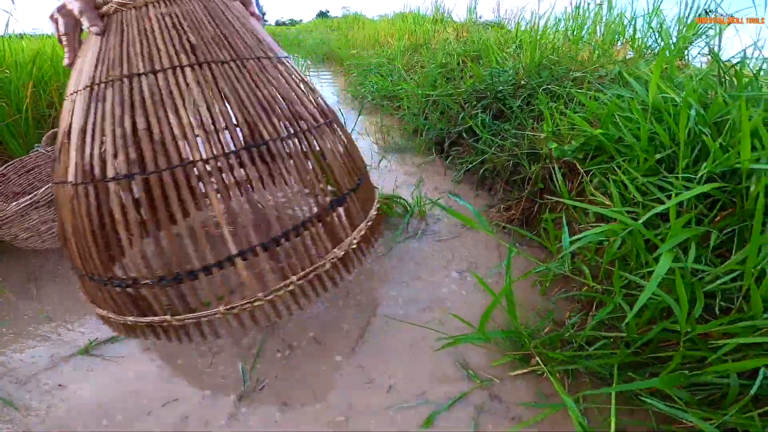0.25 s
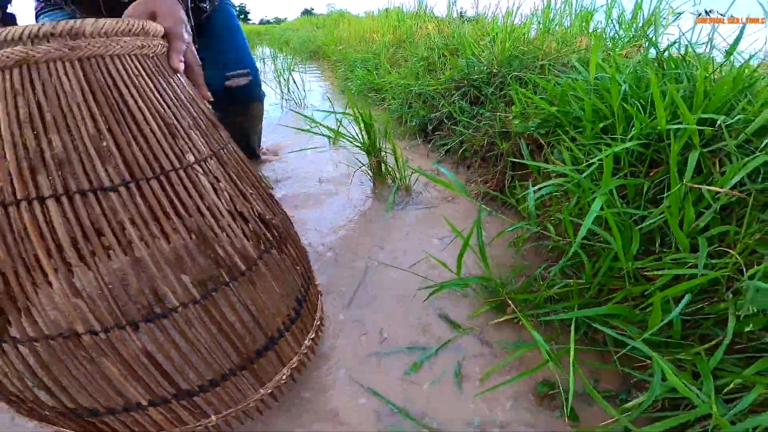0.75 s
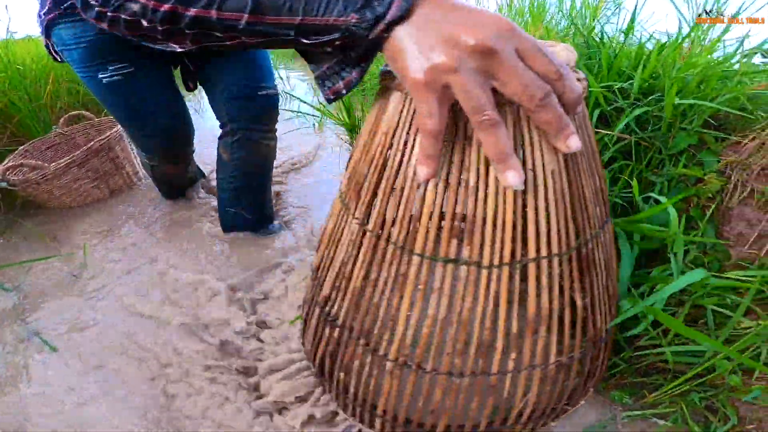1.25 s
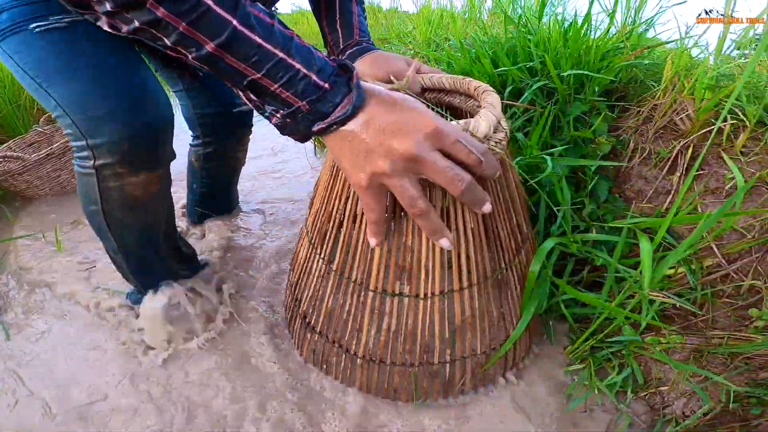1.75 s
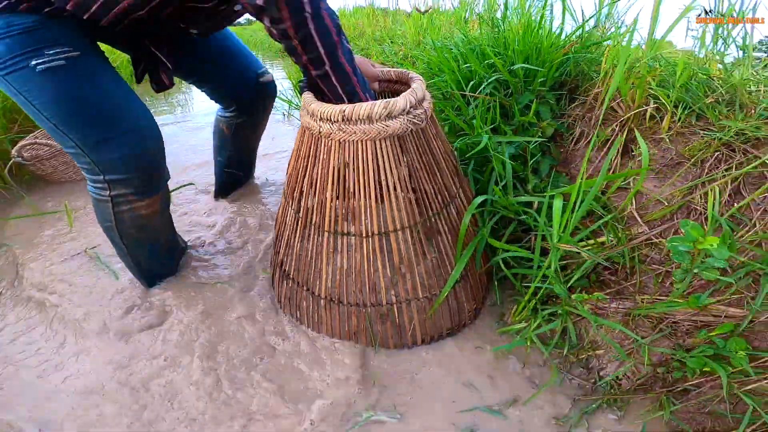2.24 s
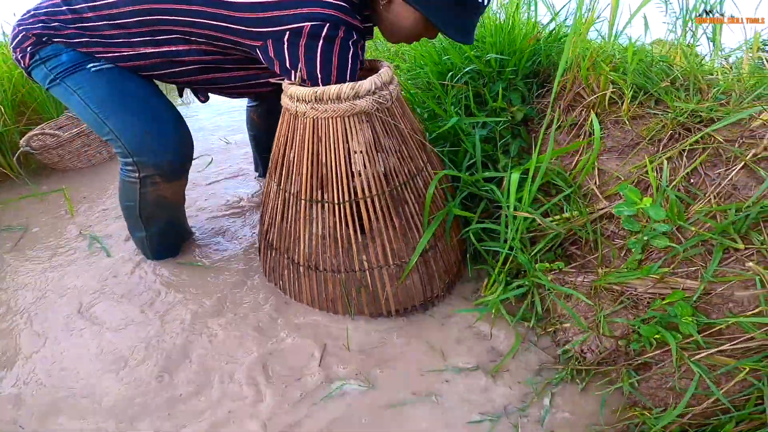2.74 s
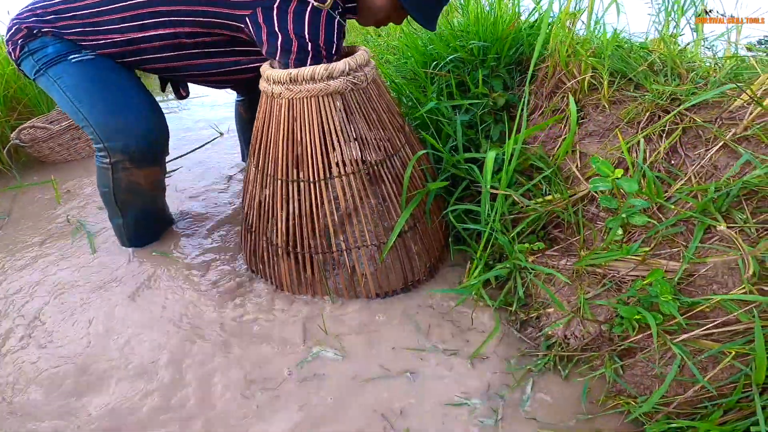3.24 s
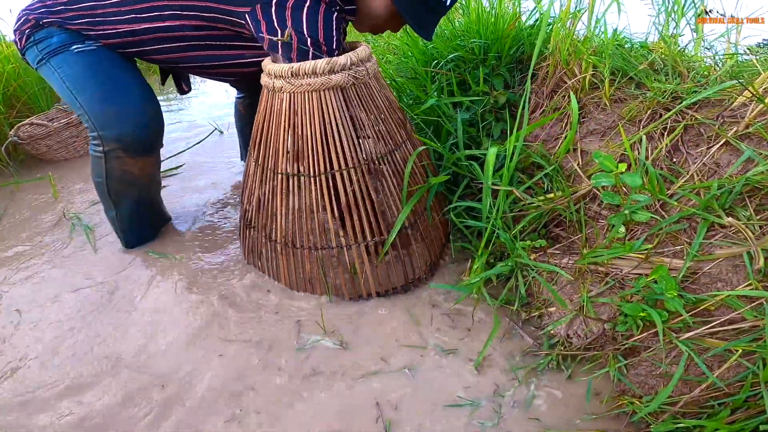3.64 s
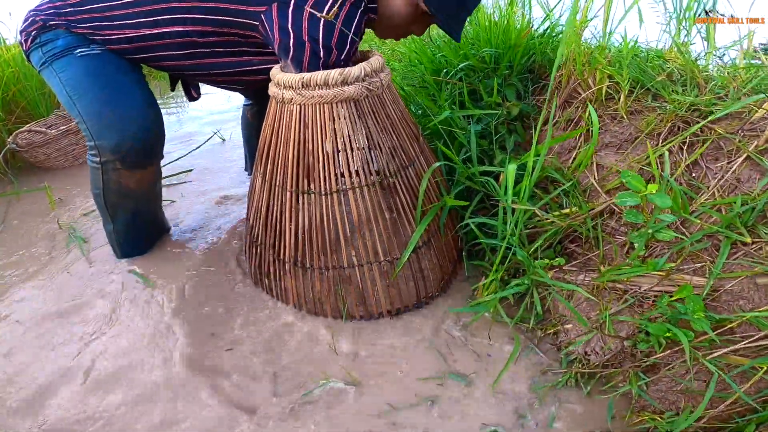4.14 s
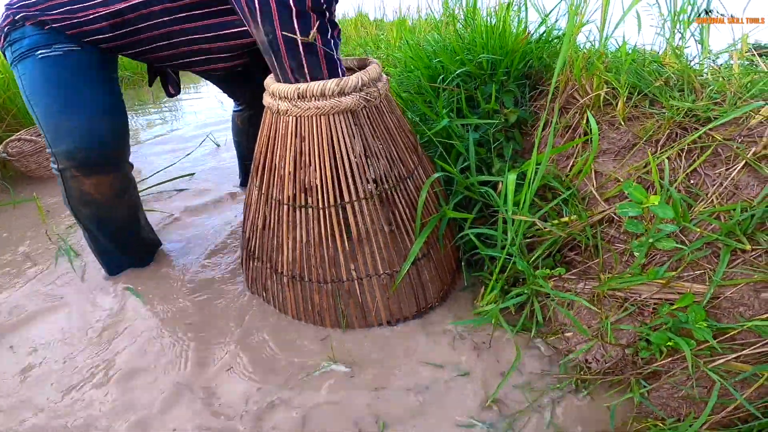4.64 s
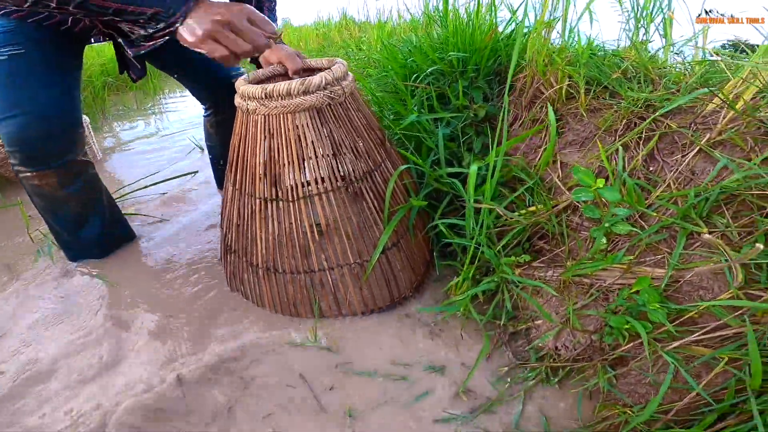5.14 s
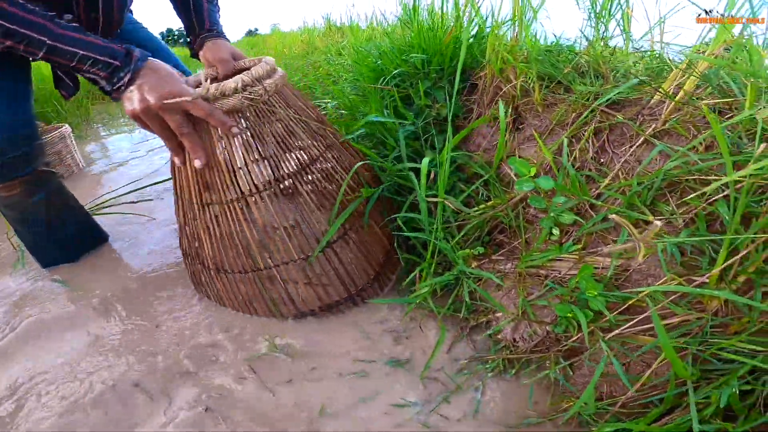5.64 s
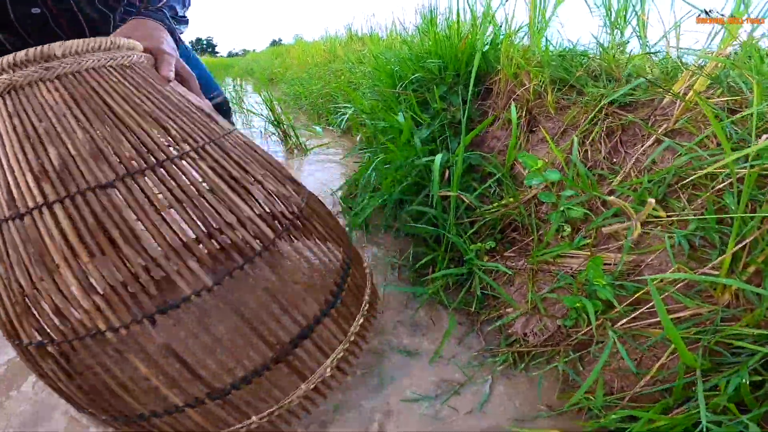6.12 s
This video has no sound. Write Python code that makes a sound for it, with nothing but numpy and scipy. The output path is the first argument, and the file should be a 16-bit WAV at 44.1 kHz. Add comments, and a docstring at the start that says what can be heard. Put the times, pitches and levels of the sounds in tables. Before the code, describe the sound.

Muddy water swashes, bubbles and drips around a pushed-down basket as single frog chirps give way to two close frogs calling rapidly.

```python
"""A rattan basket trap is pushed into shallow muddy water: boots and an arm slosh, bubbles gulp, drops tick.
Close to the microphones two frogs call, one left and one ahead, after a third on the bank.
Behind them come farther callers, a blurred chorus and the low throb of a distant engine.
Frogs are pulses ringing a throat, bubbles are gliding sines, water is swarms of damped sines with noise,
and the engine is throbbing noise; frogs and basket get a short echo off the grass banks."""
import sys
import numpy as np
from scipy import signal
from scipy.fft import rfft, irfft, next_fast_len
from scipy.io import wavfile
from scipy.ndimage import uniform_filter1d, map_coordinates

SR = 44100
rng = np.random.default_rng(int(sys.argv[2]) if len(sys.argv) > 2 else 0)


def persist_wave(psi):
    """Save psi, clipped to +-1, as 16-bit WAV."""
    counts = np.round(np.clip(psi, -1, 1) * 32767).astype(np.int16)
    wavfile.write(sys.argv[1], SR, np.atleast_2d(counts).T)


N = 281358  # samples
TIME_S = np.arange(N) / SR


def amp(db):
    """Decibels to gain."""
    return 10 ** (np.asarray(db) / 20)


def unit(x):
    """Scaled to rms 1."""
    return x / np.sqrt(np.mean(x ** 2) + 1e-20)


def along(points, hz):
    """Reads a (freq_hz, value) curve, straight on a log frequency axis."""
    freq_hz, value = np.transpose(points)
    return np.interp(np.log(hz + 1), np.log(freq_hz + 1), value)


def wobble(rate):
    """A smooth random curve, rate knots a second."""
    knots = rng.standard_normal(int(N * rate / SR) + 4)
    return map_coordinates(knots, [np.arange(N) * rate / SR])


def filtered(x, response):
    """Filters x by a response given as a function of frequency."""
    size = next_fast_len(N + 8192)
    spectrum = rfft(x, size) * response(np.fft.rfftfreq(size, 1 / SR))
    return irfft(spectrum, size)[..., :N]


def causal(points):
    """Minimum-phase impulse response of a (freq_hz, level_db) spectrum, energy 1."""
    cepstrum = irfft(np.log(amp(along(points, np.fft.rfftfreq(4096, 1 / SR)))))
    cepstrum[1:2048] *= 2  # folding the cepstrum forward gives minimum phase
    cepstrum[2049:] = 0
    impulse = irfft(np.exp(rfft(cepstrum)))[:1024]
    return impulse / np.linalg.norm(impulse)


def add(out, start_s, x):
    """Mixes x into out from start_s on, cut at the end of either."""
    part = out[..., round(start_s * SR):][..., :x.shape[-1]]
    part += x[..., :part.shape[-1]]


def sides(pan_db):
    """Left and right gains for a level difference, positive to the left."""
    return amp(np.array([[pan_db / 2], [-pan_db / 2]]))


def widen(pair, spectrum, alike):
    """Colours two unrelated signals and mixes them to a left-right likeness; rms 1."""
    def mid_and_side(hz):
        turn = np.arccos(np.clip(along(alike, hz), -1, 1)) / 2
        return amp(along(spectrum, hz)) * [np.cos(turn), np.sin(turn)]

    mid, side = filtered(pair, mid_and_side)
    return unit(np.array([mid + side, mid - side]))


def banks(x, t60, delay):
    """Short echo off the grass banks: fading noise, unlike left and right and new each time."""
    t = np.arange(SR // 5) / SR
    tail = rng.standard_normal((2, len(t))) * amp(-60 * t / t60) * (t > delay)
    echo = signal.fftconvolve(x[None], tail, axes=1)
    return echo * np.linalg.norm(x) / np.linalg.norm(echo, axis=1, keepdims=True)


# Loudness of the distant engine: start_s, level_db
ENGINE_LEVEL = [(0, -36.5), (5.1, -43), (6, -39)]
# Exhaust noise, relative: freq_hz, density_db (per Hz)
EXHAUST_SPECTRUM = [(15, -62.5), (25, -16.5), (75, 1.5), (108, -1), (139, 4), (179, -9.5), (221, -16.5),
                    (577, -37.5), (600, -69), (1320, -120)]
# Puff of each firing, relative: freq_hz, density_db (per Hz)
PUFF_SPECTRUM = [(150, -32), (220, 1), (380, -3), (520, -26), (700, -98.5)]
PUFF_DB, PUFF_SHARP = -17.5, 0.654  # level relative to the exhaust; a higher exponent shortens the puff


def engine():
    """Low exhaust noise, throbbing once per firing, with a short puff above it."""
    level_db = np.interp(TIME_S, *np.transpose(ENGINE_LEVEL))
    firing_hz = 24.0 + 1.589 * wobble(3.9)
    stroke = np.cos(2 * np.pi * np.cumsum(firing_hz) / SR)
    alike = [(30, 0.82), (70, 1.0), (150, 0.985)]  # freq_hz, left-right likeness
    throb = rng.standard_normal((2, N)) * (1 + 0.373 * stroke)
    puff = rng.standard_normal((2, N)) * np.exp(PUFF_SHARP * stroke)
    exhaust = widen(throb, EXHAUST_SPECTRUM, alike)
    puffs = widen(puff, PUFF_SPECTRUM, alike)
    return amp(level_db) * (exhaust + amp(PUFF_DB) * puffs)


# Far throats, alone and massed, relative: freq_hz, level_db
FAR_THROAT = [(1200, -29), (2300, -32.5), (2900, 1), (3150, 5.5), (3450, -8), (4000, -18), (6000, -43)]
CHORUS_DB = -49.5


def chorus():
    """The farthest frogs blur into a narrow band of noise that trembles at their pulse rate."""
    pulse_hz = 435 + 12 * wobble(9.8)
    buzz = 1 + .5 * np.cos(2 * np.pi * np.cumsum(pulse_hz) / SR)
    swell = amp(3 * np.array([wobble(9), wobble(9)]))
    noise = rng.standard_normal((2, N)) * buzz * swell
    return amp(CHORUS_DB) * widen(noise, FAR_THROAT, [(3000, 0.11)])


WAVER = .009  # random wander of the pitch, as a share
UNEVEN_DB = 2.6  # throat colour changes from call to call
RASP = .35  # air noise when fully rough


def frog(calls, shape, throat, pan_db, echo_db, lag_s):
    """Vocal-fold pulses ring the throat; rough stretches hiss, jitter and weaken every other pulse."""
    out, grid_hz = np.zeros((2, N)), np.arange(400, 15000, 400)
    share, *shape_columns = np.transpose(shape)
    for start_s, length_s, call_db, pitch_hz, sag, *sac_hz in calls:
        throat_db = along(throat, grid_hz) + UNEVEN_DB * rng.standard_normal(len(grid_hz))
        ring = causal(np.c_[grid_hz, throat_db])
        t = np.arange(int(length_s * SR)) / SR
        level_db, bend, rough = [np.interp(t / length_s, share, column) for column in shape_columns]
        waver = 1 + WAVER * np.interp(t, np.arange(12) / 80, rng.standard_normal(12))
        cycle = np.cumsum(pitch_hz * waver * bend ** sag) / SR

        at = np.flatnonzero(np.diff(np.floor(cycle), prepend=-1))
        level_z, timing_z = rng.standard_normal((2, len(at)))
        weak = np.arange(len(at)) % 2
        pulse_db = call_db + level_db[at] + rough[at] * (4.7 * level_z - 3.0 * weak)
        period = SR / pitch_hz  # samples
        size = amp(pulse_db) * np.sqrt(period)
        place = at - cycle[at] % 1 * period * (at > 0)  # between samples
        place = place + np.abs(rough[at] * timing_z) * 0.12 * period
        whole, part = place.astype(int), place % 1
        pulses = np.bincount(np.r_[whole, whole + 1], np.r_[size * (1 - part), size * part])

        puff = 1 - cycle % 1  # air is strongest just after each pulse
        air = RASP * rough * amp(call_db + level_db) * puff * rng.standard_normal(len(t))
        add(pulses, 0, air)
        voice = signal.fftconvolve(pulses, ring)
        for hz in sac_hz:  # the inflated sac lifts the harmonics near its own resonance
            voice = voice + 3 * signal.lfilter(*signal.iirpeak(hz, 15, SR), voice)

        add(out[0], start_s + lag_s, voice * amp(pan_db / 2))  # the left microphone hears it a little later
        add(out[1], start_s, voice * amp(-pan_db / 2))
        add(out, start_s, amp(echo_db) * banks(voice, t60=0.147, delay=0.00058))
    return out


# Calls of the farther frogs: start_s, level_db, pitch_hz (before the bend)
FAR_CALLS = [(0.064, -43.5, 467.1), (.09, -45.5, 420.1), (0.355, -44, 473.3), (0.639, -52, 464),
             (0.749, -52.5, 438), (2.251, -43.5, 449.3), (2.51, -43.5, 428.5), (2.68, -41.5, 466.4),
             (3.199, -42.5, 492.3), (3.29, -48.5, 433.3), (3.369, -43, 417), (3.88, -37.5, 432),
             (4.86, -46, 436.7), (5.095, -50.5, 432)]
# Course of one far call: share of length, level_db (relative), pitch factor, roughness (0-1)
FAR_SHAPE = [(0, -8, .99, .3), (.3, 0, 1.01, .12), (.7, -2, .97, .16), (1, -8, .94, .4)]
FAR_LENGTH_S = .08


def far_frogs():
    """Farther callers well to the left: pulse-driven throats with a strong bank echo."""
    calls = [(start_s, FAR_LENGTH_S, level_db, pitch_hz, 1) for start_s, level_db, pitch_hz in FAR_CALLS]
    return frog(calls, FAR_SHAPE, FAR_THROAT, pan_db=13.5, echo_db=-3.0, lag_s=0)


# Calls of the bank frog: start_s, length_s, level_db
BANK_CALLS = [(1.615, 0.058, -33.5), (1.866, 0.064, -34), (2.132, 0.0453, -29.5), (2.386, 0.0427, -29),
              (2.625, 0.0387, -30.5), (2.872, 0.038, -28.5), (3.105, 0.067, -33), (3.329, 0.00975, -21)]
# Course of one bank call: share of length, level_db (relative), pitch factor, roughness (0-1)
BANK_SHAPE = [(0, 2, .98, 0.45), (.2, 0.5, .99, 0.15), (.7, -1, 1.015, .05), (1, -3, 1.0, .6)]
# Throat and vocal sac, relative: freq_hz, level_db
BANK_FROG_THROAT = [(800, -49), (1050, -53.5), (1260, -8.5), (1700, -2.5), (2500, -10), (2950, 10.5),
                    (3360, 11.5), (3800, -4), (4600, -8.5), (6000, -22.5), (14000, -62)]
BANK_HZ = 417.8  # before the bend


def bank_frog():
    """The frog on the bank, almost centred: a throat rung at one base pitch."""
    calls = [(*call, BANK_HZ, 1) for call in BANK_CALLS]
    return frog(calls, BANK_SHAPE, BANK_FROG_THROAT, pan_db=1.0, echo_db=-6.0, lag_s=.00009)


# Calls of the left frog: start_s, length_s, pitch_hz (before the bend), sac_hz (resonance)
LEFT_CALLS = [(3.533, 0.0265, 422.8, 3253), (3.746, 0.0673, 436.6, 3131), (3.963, 0.0706, 445.4, 3189),
              (4.178, 0.0626, 438, 3486), (4.375, 0.0761, 445.3, 3334), (4.588, 0.0657, 441.2, 3495),
              (4.791, 0.0768, 440.2, 3428), (5.005, 0.0727, 440.3, 3436), (5.214, 0.0817, 435.7, 3023),
              (5.501, 0.0742, 434.4, 3214), (5.821, 0.0771, 442.5, 3004), (6.127, 0.0736, 431.6, 3095)]
# Course of one left call: share of length, level_db (relative), pitch factor, roughness (0-1)
LEFT_SHAPE = [(0, -1.5, .97, 0.3), (.2, -1, .95, .4), (.35, -1.5, .985, 0.1), (.62, 0.5, 1.01, .05),
              (.72, -4, .98, .6), (1, -10.5, .91, 0.7)]
# Throat and vocal sac, relative: freq_hz, level_db
LEFT_FROG_THROAT = [(700, -85.5), (1000, -29.5), (1320, -3), (1770, -12.5), (2200, -9), (2640, -6),
                    (3080, 2), (3520, -2.5), (3950, -7.5), (4400, -13.5), (5500, -29), (14000, -61.5)]
LEFT_DB = -29.5


def left_frog():
    """The near frog on the left: its sac resonance shifts from call to call."""
    calls = [(start_s, length_s, LEFT_DB, pitch_hz, 1, sac_hz)
             for start_s, length_s, pitch_hz, sac_hz in LEFT_CALLS]
    return frog(calls, LEFT_SHAPE, LEFT_FROG_THROAT, pan_db=14.5, echo_db=-4.0, lag_s=.00009)


# Calls of the front frog: start_s, length_s, level_db, pitch_hz (before the bend), sag (power of the bend)
FRONT_CALLS = [(3.58, 0.0638, -22, 444, 0.504), (3.921, 0.072, -24.5, 443, 0.279),
               (4.157, 0.074, -23.5, 444, 0.145), (4.361, 0.0764, -25.5, 444.6, 0.34),
               (4.561, 0.023, -23, 445, 0.478), (4.582, 0.034, -21, 436, 0.62),
               (4.76, 0.077, -26, 443.5, 1.28), (4.959, 0.071, -23.5, 442, 0.96),
               (5.168, 0.084, -26, 437, 1.4), (5.376, 0.085, -28, 430, 1.32),
               (5.661, 0.075, -27, 423, 1.02), (6.0, 0.0572, -23, 431, 1.66),
               (6.305, 0.0664, -24.5, 438, 0.81)]
# Course of one front call: share of length, level_db (relative), pitch factor, roughness (0-1)
FRONT_SHAPE = [(0, 0, 1.035, .5), (.08, -2, 1.022, .13), (.3, -1, 1.01, .08), (.52, -1.5, .94, .15),
               (.66, -5, .89, .35), (1, -11, .86, .55)]
# Throat and vocal sac, relative: freq_hz, level_db
FRONT_FROG_THROAT = [(700, -52.5), (1000, -43.5), (1320, -9), (1770, -4), (2200, -10), (2640, -2.5),
                     (3080, 17.5), (3520, -3), (3950, -2.5), (4400, -9.5), (5500, -17), (6500, -23),
                     (8000, -74)]


def front_frog():
    """The near frog ahead: each call lets its pitch sag by a different amount."""
    return frog(FRONT_CALLS, FRONT_SHAPE, FRONT_FROG_THROAT, pan_db=2.4, echo_db=-8, lag_s=.00003)


# Rattan slipping in the hands: start_s, level_db, pitch_hz
SQUEAKS = [(0.984, -21, 1355), (0.999, -26.5, 1455)]
# Partials of the squeak: multiple of the pitch, level_db (relative)
SQUEAK_PARTIALS = [(1, -6), (2, -1)]


def squeak():
    """Two quick stick-slip chirps of wet rattan, at the left, with a short echo."""
    out, t = np.zeros((2, N)), np.arange(SR // 20) / SR
    for start_s, level_db, pitch_hz in SQUEAKS:
        swell = t / 0.00468 * np.exp(1 - t / 0.00483)
        slip = 0.0041 * np.cumsum(rng.standard_normal(len(t)))  # uneven slips roughen the tone
        cycle = pitch_hz * t + slip
        tone = sum(amp(db) * np.sin(2 * np.pi * k * cycle) for k, db in SQUEAK_PARTIALS)
        chirp = amp(level_db) * swell * tone
        add(out, start_s, chirp * sides(13.1))
        add(out, start_s, amp(-8) * banks(chirp, t60=0.052, delay=0.0055))
    return out


# Drops and snaps: start_s, level_db, pitch_hz (at the start), splat_db (relative to the ring)
DROP_HITS = [(0.228, -24, 1710, -17), (0.3037, -24.5, 7300, 7), (0.58, -31, 1795, 5.5),
             (1.337, -14.5, 2056, -25.5), (1.502, -17.5, 1465, 0), (1.5417, -26, 1410, -6),
             (2.579, -34.5, 1570, 3.5), (2.615, -21.5, 1679, -10), (2.7352, -16.5, 2800, -35.5),
             (2.7916, -17.5, 2770, -31.5), (2.92, -19, 1947, -12.5), (2.9612, -24.5, 3410, 7.5),
             (3.388, -19.5, 3570, -42.5), (3.439, -23.5, 1482, -2), (3.5142, -25.5, 3090, -33.5),
             (3.7542, -12, 3396, -0.5), (3.898, -25, 2920, 0), (4.4809, -19.5, 1578, -24.5),
             (4.496, -17, 3510, -31.5), (4.5143, -20, 3130, -30.5), (4.685, -31, 1768, -17.5),
             (5.1406, -30.5, 3010, 12.5), (5.4705, -21.5, 1900, -28), (6.238, -25, 1775, -17.5),
             (6.284, -23, 1562, -10.5)]


def drops():
    """Each drop rings a few rising cycles under a bright noise splat."""
    out, t = np.zeros((2, N)), np.arange(SR // 6) / SR
    bright = signal.butter(3, [4200, 8000], "band", fs=SR)
    for start_s, level_db, pitch_hz, splat_db in DROP_HITS:
        ring = np.sin(2 * np.pi * pitch_hz * t * (1 + 4 * t)) * amp(-60 * t * pitch_hz / 45)
        hiss = rng.standard_normal((3, len(t)))
        shared_hiss = hiss[0] + .5 * hiss[1:]  # one part common to both sides, one apart
        splat = signal.lfilter(*bright, shared_hiss) * amp(-60 * t / 0.01376)
        add(out, start_s, amp(level_db) * (ring * sides(0.81) + amp(splat_db) * splat))
    return out


# Air pockets pinching off: start_s, length_s, level_db, from_hz, rise (end pitch over start pitch)
AIR_GLIDES = [(0.051, 0.07, -41.5, 845, 2.52), (0.299, 0.032, -48, 675, 1.96),
              (1.19, 0.0623, -30.5, 356.4, 1.19), (2.944, 0.0554, -40, 377.7, 1.98),
              (2.963, 0.0252, -35, 725.4, 1.53), (3.722, 0.0326, -29.5, 953, 1.97),
              (4.042, 0.036, -38, 937, 1.62), (4.257, 0.072, -44, 848, 2.3),
              (5.102, 0.0347, -41, 729, 1.96), (5.213, 0.0493, -43, 857.5, 1.32)]
GLIDE_BENDS = 1.8  # the rise quickens toward the end


def glides():
    """Air pockets pinch off as sines that glide upward."""
    out, t = np.zeros((2, N)), np.arange(SR // 6) / SR
    for start_s, length_s, level_db, from_hz, rise in AIR_GLIDES:
        share = np.clip(t / length_s, 0, 1)
        swell = np.sin(np.pi * np.sqrt(share)).clip(0)
        glide_hz = from_hz * rise ** (share ** GLIDE_BENDS)
        tone = np.sin(2 * np.pi * np.cumsum(glide_hz) / SR)
        add(out, start_s, amp(level_db) * swell * tone * sides(-0.92))
    return out


# Large bubbles: start_s, level_db (before the onset), pitch_hz (nominal; the ring starts 2 % below)
GULPS = [(.015, -31, 712), (.163, -30, 1955), (0.242, -28.5, 1390), (0.282, -29.5, 1165), (.297, -26, 1116),
         (.312, -33, 1580), (.326, -33.5, 1840), (0.393, -32.5, 836), (0.574, -32, 1015), (1.045, -18, 593),
         (1.097, -22.5, 410.4), (1.13, -21.5, 320.6), (1.428, -19, 421), (1.448, -11, 1692),
         (1.462, -16, 1429), (1.513, -10.5, 1002), (1.537, -16.5, 1092), (1.625, -21.5, 846),
         (1.662, -19.5, 349), (1.691, -23.5, 232.7), (1.724, -21.5, 414.3), (2.711, -20.5, 1114),
         (2.745, -19.5, 834), (2.765, -22, 785), (2.973, -17, 885), (3.004, -18, 1394),
         (3.054, -21.5, 1416), (3.055, -26.5, 758), (3.085, -23.5, 1076), (3.41, -16, 1234),
         (3.412, -30, 668), (3.584, -15.5, 598.7), (3.628, -14, 972), (3.715, -13, 880), (3.742, -16, 982),
         (4.492, -10, 1095), (4.519, -21, 732), (6.073, -24, 1150)]
BUBBLE_T60_S, SMALL_DAMPS = 0.0367, 0.487  # ring of a 1 kHz bubble; power of pitch by which small ones die sooner


def bubbles():
    """Single gulps: damped sines that rise a random amount as they ring."""
    out, t = np.zeros((2, N)), np.arange(SR // 6) / SR
    for start_s, level_db, pitch_hz in GULPS:
        t60 = BUBBLE_T60_S * (1000 / pitch_hz) ** SMALL_DAMPS
        fade = amp(level_db - 60 * t / t60) * (1 - np.exp(-t / 0.00135))
        bend = 0.9812 + 0.0755 * rng.random() * t / t60
        add(out, start_s, fade * np.sin(2 * np.pi * pitch_hz * t * bend) * sides(-1.26))
    return out


# Sloshes of basket, boots and arm: crest_s, swell_s (before it), t60_s (gurgle, after it), gurgle_db, spray_db
SLOSH_MOVES = [(0, .01, 1.28, -49, -43.5), (0.238, 0.097, 0.284, -66, -36), (.295, 0.052, 1.57, -52, -42.5),
               (0.572, 0.036, 0.63, -42, -47), (1.071, 0.111, 1.52, -39.5, -31.5),
               (1.3, 0.166, 0.85, -31, -34.5), (1.545, 0.317, 0.0192, -25.5, -23.5),
               (1.639, 0.106, 1.4, -31, -37.5), (2.039, 1, 0.191, -38, -34.5),
               (2.751, 0.2398, 0.862, -37, -33), (3.05, 0.095, 0.82, -36, -38),
               (3.711, 0.3114, 0.267, -32, -30), (3.94, 0.2, 0.296, -49, -34),
               (4.16, 0.249, 0.39, -40.5, -45), (4.47, 0.408, 0.38, -50.5, -39.5),
               (4.492, 0.007, 0.347, -26, -32), (5.12, 0.98, 0.81, -63, -43.5),
               (5.5, 0.435, 1.2, -43.5, -41), (5.92, 0.34, 2.2, -60, -41),
               (5.988, 0.029, 1.35, -38.5, -35.5), (6.38, 0.184, 1.1, -38, -40)]
SWELL_DB, ATTACK_S, SPRAY_LINGERS = 13.5, 0.016, 1.752  # growth over a swell, its onset, spray t60 over gurgle t60
CALM_GURGLE_DB, CALM_SPRAY_DB = -83.5, -48  # ripples between sloshes


def sloshes():
    """Gurgle and spray levels in dB: each slosh sets in, swells to its crest and fades, the spray more slowly."""
    power = np.ones((2, N)) * amp([[CALM_GURGLE_DB], [CALM_SPRAY_DB]]) ** 2
    for crest_s, swell_s, t60_s, *crest_db in SLOSH_MOVES:
        before, after = np.clip(crest_s - TIME_S, 0, 9), np.clip(TIME_S - crest_s, 0, 9)
        onset = np.clip(1 + (swell_s - before) / ATTACK_S, 0, 1)
        fade_db = 60 * after / (t60_s * np.array([[1], [SPRAY_LINGERS]]))
        level_db = np.c_[crest_db] - SWELL_DB * before / swell_s - fade_db
        power += (onset * amp(level_db)) ** 2
    return 10 * np.log10(power)


def grains(count, centre_hz, spread, cycles, scatter_db, rise):
    """Random damped sines whose pitch rises as the bubble nears the surface; rms 1."""
    start, luck = rng.random((2, count, 1))
    hz = np.clip(centre_hz * np.exp(spread * rng.standard_normal((count, 1))), 200, 14000)
    k = np.arange(int(3 * cycles * SR / centre_hz))
    turns = hz * k / SR
    size = amp(-scatter_db * np.log(luck).clip(-4)) * np.sqrt(hz)
    bend = 1 + 2 * rise * rng.random((count, 1)) * turns / cycles
    wave = size * np.sin(2 * np.pi * turns * bend) * np.exp(-2 * turns / cycles)
    at = (start * N).astype(int) + k
    return unit(np.bincount(at.ravel(), wave.ravel(), N + len(k))[:N])


# Low churned water, relative: freq_hz, density_db (per Hz)
GURGLE_SPECTRUM = [(120, -49), (200, -21), (255, -16), (437, -6), (765, -3.5), (966, -1), (2500, -5),
                   (3250, -33), (5500, -120)]
# Fine splashing, relative: freq_hz, density_db (per Hz)
SPRAY_SPECTRUM = [(530, -26.5), (900, -11), (967, -1.5), (1260, 2.5), (2150, 1.5), (2280, 2.5),
                  (7000, -4.5), (10100, -15), (13300, -20.5), (15600, -61.5)]
# Likeness of the splash at the two microphones: freq_hz, likeness (0-1)
SPLASH_ALIKE = [(60, 0.87), (180, 0.91), (550, 0.96), (1650, 0.835), (4970, 0.585), (15000, 0.026)]


def water():
    """Churned mud: low bubbles follow the gurgle, fine grains and hiss follow the spray."""
    gurgle_db, spray_db = sloshes()
    dense = np.clip((spray_db + 41.5) / 14, 0, 1)  # a strong rush packs the grains into an even wash
    lively = np.clip((spray_db - CALM_SPRAY_DB) / 6, .42, 1)  # calm water ticks less
    low, fine = np.zeros((2, 2, N))
    for k in range(2):
        large = grains(count=3600, centre_hz=759.5, spread=0.5525, cycles=12.08, scatter_db=5.0, rise=0.1759)
        rumble = (0.29 + 2.31 * dense) * rng.standard_normal(N)
        low[k] = (1 - 0.163 * dense) * large + rumble

        small = grains(count=9000, centre_hz=4242, spread=0.4653, cycles=14.0, scatter_db=4.5, rise=0.0635)
        middle = grains(count=6000, centre_hz=1901, spread=0.4491, cycles=11, scatter_db=7.5, rise=0.12)
        froth = grains(count=30000, centre_hz=2457.6, spread=0.5773, cycles=10.0, scatter_db=3.5, rise=0.21)
        hiss = amp(2.884 * (1 - dense) * wobble(30)) * rng.standard_normal(N)
        hiss = hiss - 0.65 * (1 - lively) * uniform_filter1d(hiss, size=13)  # the quiet hiss is thinner below
        small_ticks = amp(3.77 * (1 - 0.74 * dense) * wobble(25)) * small
        middle_ticks = 0.938 * (1 - .5 * dense) * amp(1.39 * wobble(18)) * middle
        fine[k] = lively * (small_ticks + middle_ticks) + 1.039 * hiss + 0.679 * dense * froth
    gurgle = amp(gurgle_db) * widen(low, GURGLE_SPECTRUM, SPLASH_ALIKE)
    spray = amp(spray_db) * widen(fine, SPRAY_SPECTRUM, SPLASH_ALIKE)
    return gurgle + spray


def scene():
    """All sources at the two microphones, from the background to the water close by."""
    background = engine() + chorus() + far_frogs()
    frogs = bank_frog() + left_frog() + front_frog()
    trap = squeak() + drops() + glides() + bubbles() + water()
    return background + frogs + trap


TOP_HZ = 15725


def record(dry):
    """The recorder keeps nothing from its band limit up."""
    return filtered(dry, lambda hz: hz < TOP_HZ)


dry = scene()
out = record(dry)
persist_wave(out)
```